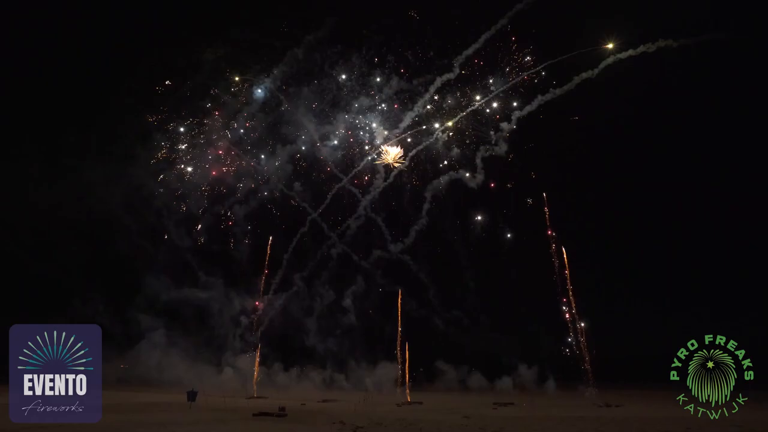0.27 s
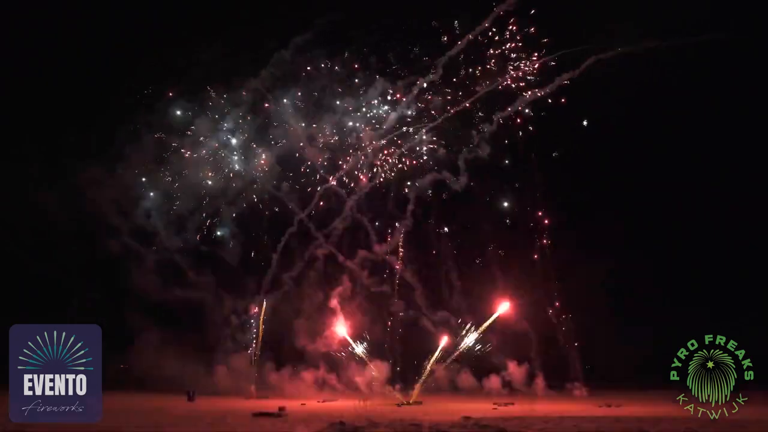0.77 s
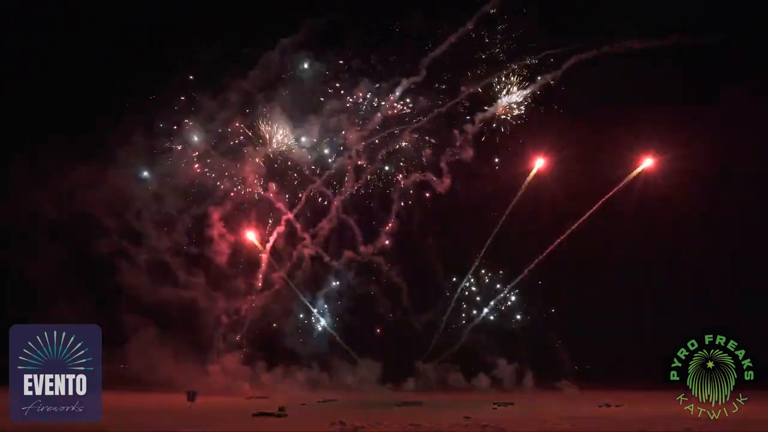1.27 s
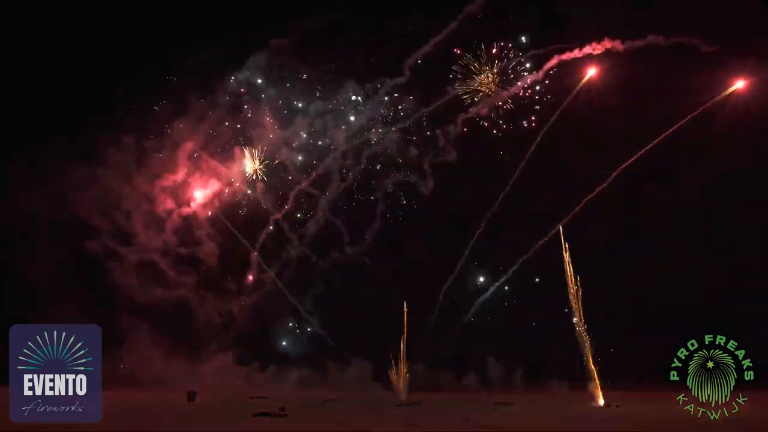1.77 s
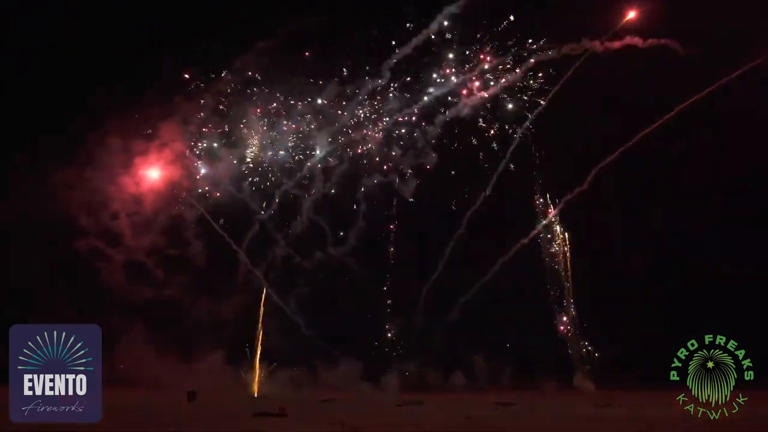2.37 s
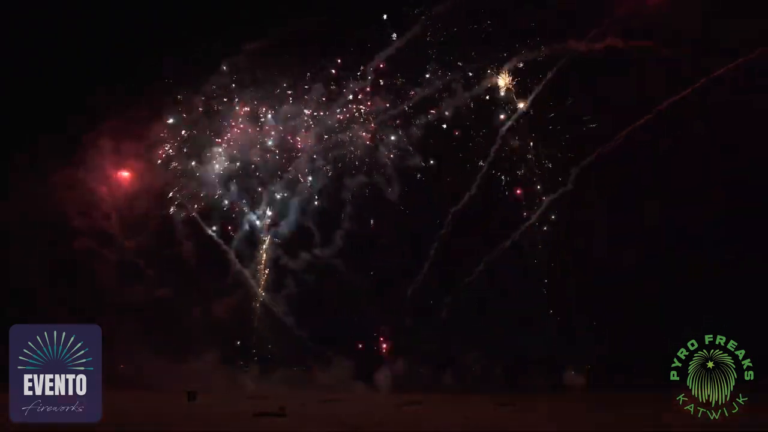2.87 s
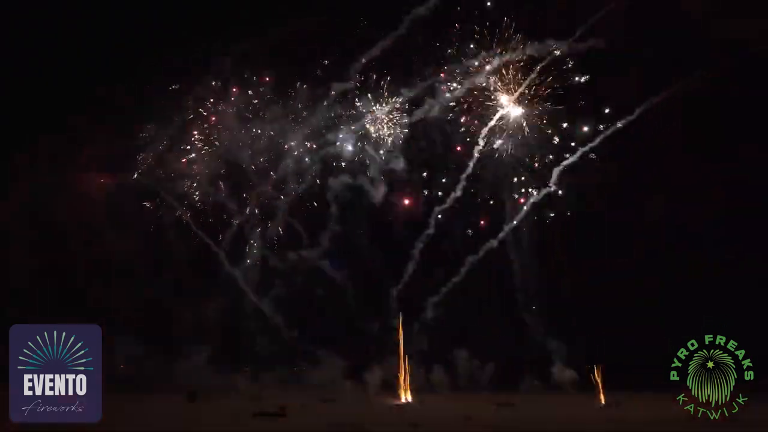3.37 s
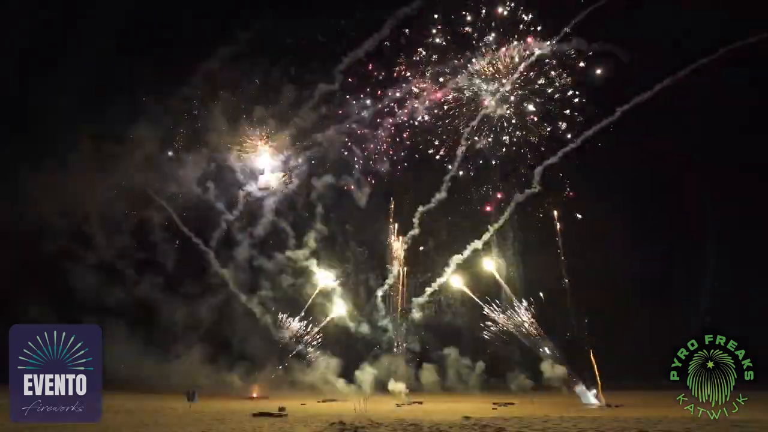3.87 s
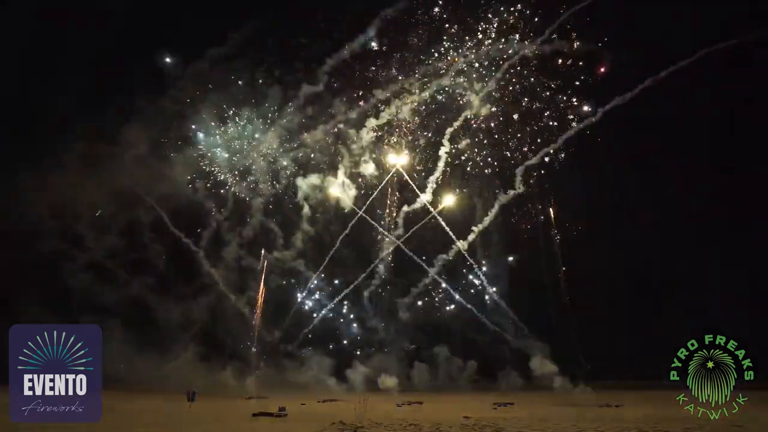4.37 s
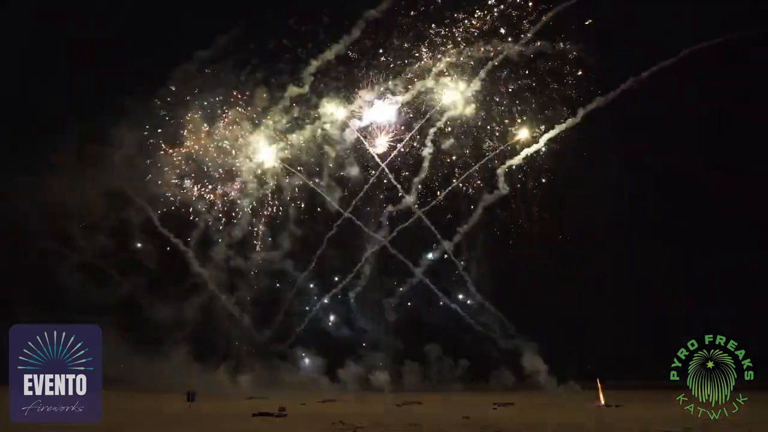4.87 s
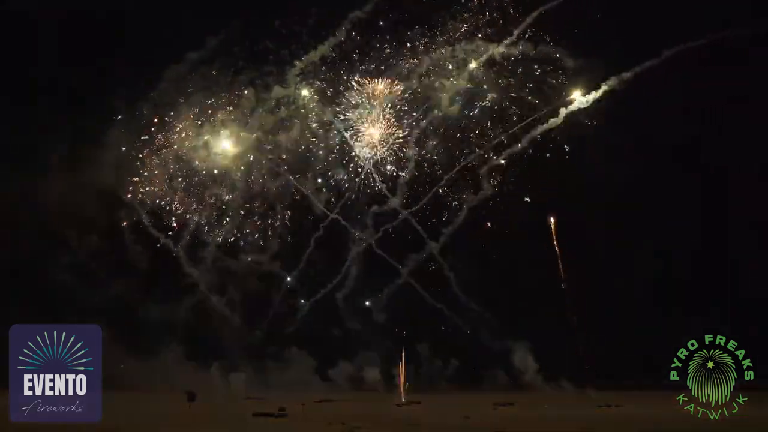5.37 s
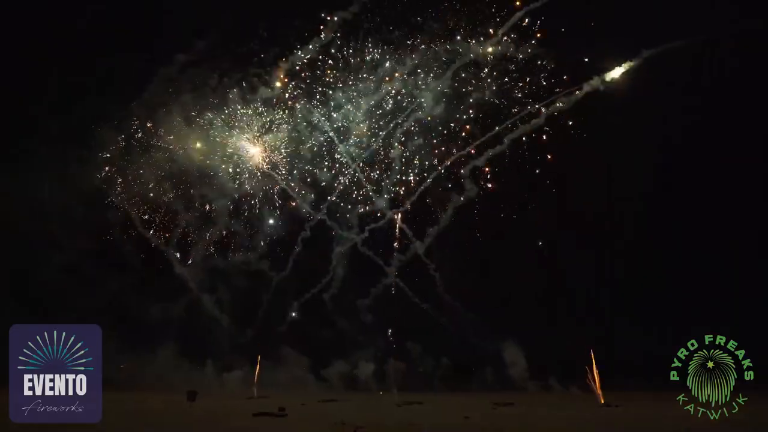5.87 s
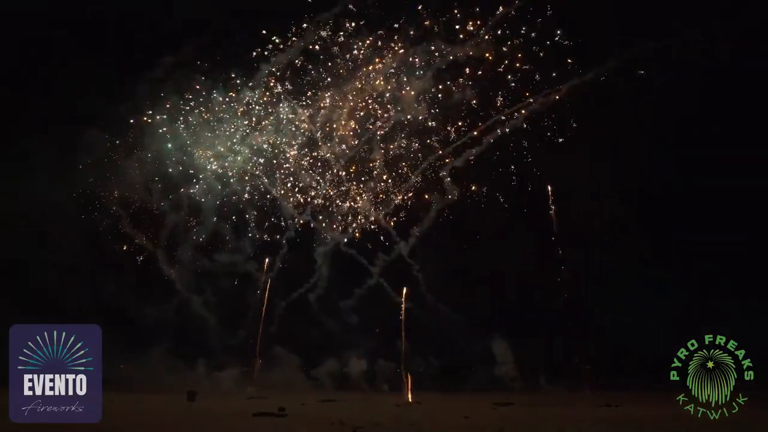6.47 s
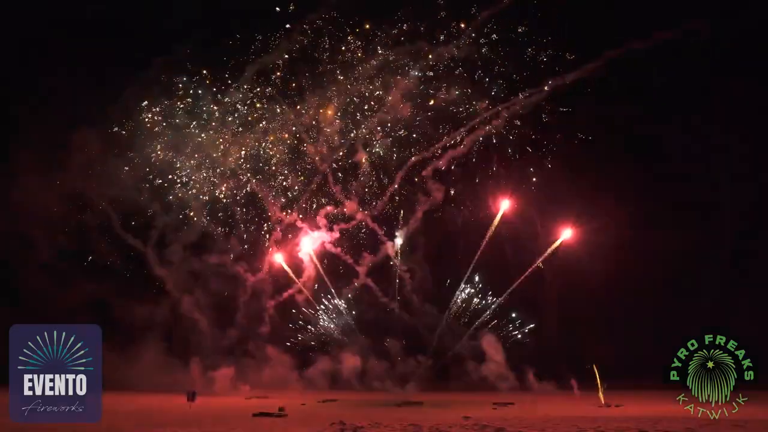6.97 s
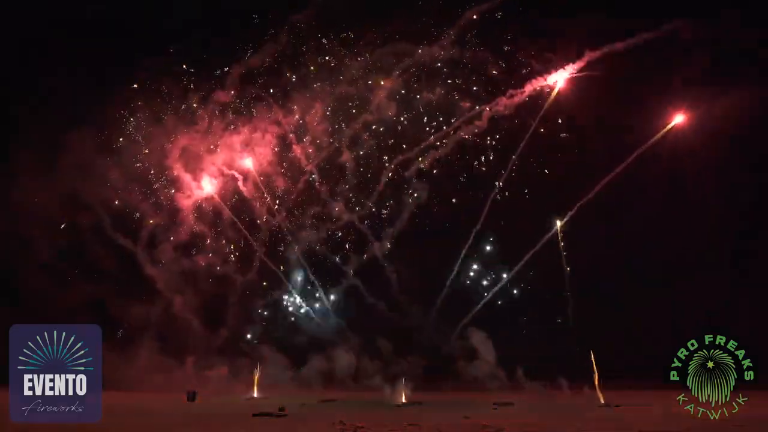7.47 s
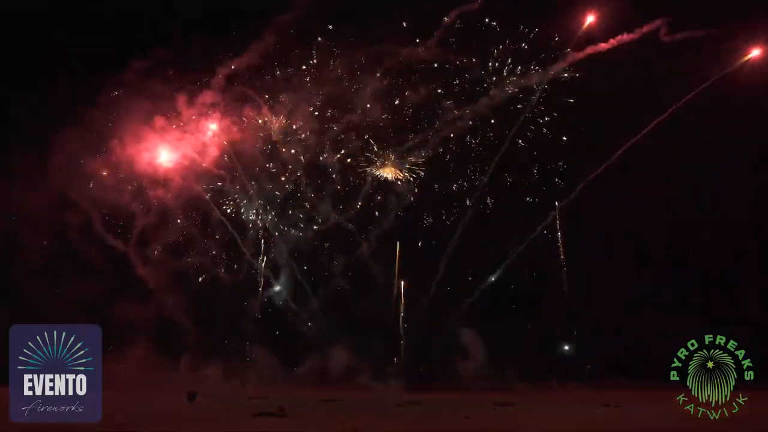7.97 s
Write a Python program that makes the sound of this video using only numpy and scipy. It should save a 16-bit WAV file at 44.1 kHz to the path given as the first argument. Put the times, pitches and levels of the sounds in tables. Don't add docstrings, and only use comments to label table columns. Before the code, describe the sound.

Dense volleys of hard, clipped firework bursts and drier launch cracks, with brief lulls of long dull rumble, on a wide open field at night.

```python
import sys
import numpy as np
from scipy import signal
from scipy.fft import rfft, irfft
from scipy.io import wavfile
from scipy.ndimage import uniform_filter1d

SR = 44100
rng = np.random.default_rng(int(sys.argv[2]) if len(sys.argv) > 2 else 0)


def ratio_of_db(decibels):
    return 10 ** (np.asarray(decibels, float) / 20)


def bounce(signal):
    frames = np.transpose(np.atleast_2d(signal))
    limited = np.clip(frames, -1, 1)
    pcm = np.round(limited * 32767).astype(np.int16)
    wavfile.write(sys.argv[1], SR, pcm)


N = 363384
LEAD = 2048
PADDED = N + 2 * LEAD


def colour(x, points):
    hz, db = np.transpose(points)
    f = np.maximum(np.arange(x.shape[-1] // 2 + 1) * SR / x.shape[-1], 1)
    gain = ratio_of_db(np.interp(np.log(f), np.log(hz), db))
    y = irfft(rfft(x) * gain, x.shape[-1])
    return y / np.sqrt(np.mean(y ** 2))


def diffuse(size, mid_points, side_points, side_db):
    mid, side = rng.standard_normal((2, size))
    difference = ratio_of_db(side_db) * colour(side, side_points)
    return colour(mid, mid_points) + difference * np.array([[1], [-1]])


def blast(n, hz, cycles, rise):
    u = np.maximum(n, 0)
    front = 1 - np.exp(-u / rise)
    fade = np.exp(-(u * hz / SR / cycles) ** 2.03)
    return front * np.cos(2 * np.pi * hz * u / SR) * fade


def add(out, s, wave, direction, edge, port_lag):
    at = s * SR + LEAD
    n = np.arange(-4, 900) - at % 1
    body = wave(n - port_lag / 2)
    step = edge * (wave(n) - wave(n - port_lag))
    i = int(at) - 4
    left = body * (1 - direction) / 2 - step
    right = body * (1 + direction) / 2 + step
    out[:, i:i + len(n)] += [left, right]


# frequency [Hz], strength [dB per Hz].
NIGHT_MID = [(20, -20.5), (50, 7), (150, -1.5), (500, -8.5), (1200, -9), (3000, -23.5), (8000, -27),
             (12500, -35.5), (14500, -63.5)]
NIGHT_SIDE = [(20, -19), (50, -8.5), (150, -7.5), (500, -11), (1200, -10), (3000, -21.5), (8000, -32.5),
              (12500, -41), (14000, -72)]
# start and end in seconds [s], first and last pitch [Hz], level [dB].
WHISTLES = [
    (1.062, 1.32, 1135, 1056, -69),
    (6.196, 6.637, 843, 829, -64.5),
    (7.247, 7.754, 1062, 1045, -72),
]


def night():
    t = np.arange(N) / SR
    out = ratio_of_db(-66) * diffuse(N, NIGHT_MID, NIGHT_SIDE, 4)
    for start, end, hz0, hz1, db in WHISTLES:
        swell = np.sin(np.pi * np.clip((t - start) / (end - start), 0, 1)) ** .5
        flutter = ratio_of_db(1.5 + colour(rng.standard_normal(N), [(15, 3), (40, -43.5)]))
        pitch = np.interp(t, [start, end], [hz0, hz1])
        tone = np.sin(2 * np.pi * np.cumsum(pitch) / SR)
        out = out + ratio_of_db(db) * swell * np.array([[.5], [1.3]]) * flutter * tone
    return out


# start in seconds [s], crack level [dB], thump level [dB].
RIGHT_LIFTS = [(.012, -23, -21), (.1748, -20, -14.5), (.8597, -13.5, -15.5), (1.6057, -20, -16),
               (1.6308, -24.5, -12), (1.6698, -25.5, -14), (1.6993, -20.5, -13.5), (1.741, -18.5, -14),
               (1.7812, -18, -13.5), (2.0951, -19, -11), (2.1432, -18.5, -11.5), (2.1875, -20.5, -12.5),
               (2.241, -41, -20), (3.519, -18.5, -11), (3.6075, -16.5, -31.5), (3.8129, -21, -16.5),
               (3.8686, -9.5, -7.5), (3.8716, -12, -19.5), (4.0681, -22, -15), (5.134, -19.5, -14.5),
               (6.0798, -20, -12.5), (6.8593, -8.5, -7), (7.2037, -22, -15.5), (7.6868, -23.5, -14)]
LEFT_LIFTS = [(.418, -26, -18.5), (.786, -24, -21), (.8161, -25.5, -19.5), (2.3778, -27, -15),
              (2.446, -24.5, -19), (2.5461, -31, -25), (2.591, -25.5, -19.5), (2.6334, -24.5, -19.5),
              (3.758, -26, -22), (3.9125, -21, -10), (3.919, -28.5, -25.5), (4.2282, -25.5, -20),
              (4.31, -27.5, -19.5), (4.34, -27, -22), (4.348, -14, -12.5), (4.3785, -23.5, -17),
              (5.1755, -26, -20), (5.7598, -31, -27.5), (6.0616, -41.5, -22.5), (6.4821, -25, -17),
              (7.7383, -20, -18.5), (7.7975, -25, -20), (7.891, -37, -29)]
SHORT_TUBE_LIFTS = [(.2791, -22, -17), (.4379, -21.5, -19.5), (.9566, -8.5, -10.5), (.9679, -24.5, -29.5),
                    (1.9469, -15.5, -14.5), (2.864, -30, -36), (3.205, -28, -22), (3.592, -18.5, -15.5),
                    (3.6263, -26.5, -17), (3.6472, -22, -20), (3.7527, -24, -29), (6.4408, -19, -19.5),
                    (6.72, -24.5, -20.5), (6.854, -11.5, -5.5), (7.7351, -22, -21), (7.905, -15.5, -13.5)]
LONG_TUBE_LIFTS = [(.858, -8, -16), (.8696, -20, -41), (.9543, -18, -20), (1.8263, -24.5, -21),
                   (1.9837, -20, -26), (2.215, -17.5, -24), (3.6669, -20.5, -18.5), (3.921, -19, -17.5)]


def tubes():
    # lifts, direction (-1 left to 1 right), tube pitch Hz
    racks = [(RIGHT_LIFTS, 1.6, 257), (LEFT_LIFTS, -0.75, 183),
             (SHORT_TUBE_LIFTS, 0.62, 194), (LONG_TUBE_LIFTS, .1, 183)]
    return [(*row, direction, hz) for rows, direction, hz in racks for row in rows]


# start in seconds [s], blast level [dB],
# direction [-1 left to 1 right], delay of the ground echo [ms].
LEFT_BURSTS = [(.0815, 1.7, -0.59, 5.9), (.6536, 1, -.6, 6.38), (1.4738, 1.1, -0.5, 6.25),
               (1.718, 3, -0.24, 6.9), (2.0456, 0.5, -.75, 5.87), (2.3428, 0, -.59, 6.22),
               (2.5016, 0.5, -.59, 6.15), (4.0061, -1, -0.64, 7.2), (4.1122, 1.5, -.59, 6.21),
               (4.156, -1.5, -.67, 6.33), (4.16, 1.1, -.5, 5.56), (4.1887, 1.4, -.56, 6.07),
               (4.2438, 1.6, -.68, 5.98), (4.3938, 0.8, -.65, 5.95), (5.7775, 1.6, -0.58, 6.25),
               (5.8002, 1, -.65, 8.2), (5.901, 1.5, -0.68, 6.0), (5.9183, 1, -0.85, 6.05),
               (5.9724, 0, -.62, 6.53), (6.0312, 2.5, -.62, 6.15), (6.1516, 1.2, -.63, 6.28),
               (7.9168, 1.5, -.63, 5.56), (8.1958, 0.3, -.46, 6.53)]
MIDDLE_BURSTS = [(.2206, 3.5, .14, 7.05), (.5208, 1.6, 0.22, 6.41), (2.2181, 3.5, 0.18, 7.04),
                 (3.4437, 3, 0.12, 7.11), (3.481, -0.4, 0.33, 7.31), (5.0634, 4, 0.093, 7.34),
                 (5.1554, 3, 0.21, 6.84), (5.1893, 1.5, .35, 7.3), (5.2112, 4, -0.022, 7.34),
                 (5.382, 2.5, 0.18, 7.14), (5.396, 2.8, -.27, 6.73), (5.4213, 1.7, .57, 7.03),
                 (5.448, 4, -0.015, 6.7), (5.5011, 2.5, .22, 7.12), (5.5603, 0.5, 0.57, 7.53),
                 (5.5652, 3.5, -0.11, 7.03), (5.6104, 2.5, 0.19, 6.78), (6.9339, 3, .19, 6.94),
                 (8.1781, 4, 0.13, 6.37)]
RIGHT_BURSTS = [(.1294, 0.8, 1.6, 7.7), (1.3935, 1.3, 1.4, 7.3), (1.9643, 2.6, 0.88, 8.1),
                (2.841, 4, 1.01, 6.36), (3.1444, 2.2, 1.2, 7.5), (3.176, 3, 1.4, 7.4),
                (3.3971, 3.1, 0.65, 7.2), (3.4017, 1.5, 1.7, 7.62), (3.4489, 2.2, 1.4, 7.9),
                (3.5435, 3.7, 0.87, 7.2), (3.6847, 3, 0.75, 7.31), (3.7013, 4, 1.7, 7.2),
                (3.7816, 1.5, 1.08, 7.55), (3.9596, 2, 1, 7.4), (3.994, 2.8, 1, 7.9), (5.2262, 2, 1.1, 8),
                (5.7331, 2.5, 1.2, 7.45), (6.8396, 4, 0.88, 7.5), (7.8608, 2, 1.01, 7.6)]


def shells():
    # bursts, shock edge dB, ground echo dB
    batteries = [(LEFT_BURSTS, -8, -7.5), (MIDDLE_BURSTS, -6.5, -8), (RIGHT_BURSTS, -3, -7)]
    return [(s, db, direction, edge_db, echo_ms, echo_db)
            for rows, edge_db, echo_db in batteries
            for s, db, direction, echo_ms in rows]


# start in seconds [s], blast level [dB], direction [-1 to 1].
EARLIER_BURST = (0.00021, 0.9, 0.18)
# frequency [Hz], strength [dB].
SCATTER_MID = [(60, -9), (150, 7.5), (350, 6.5), (700, 3), (1500, -3), (3000, -9), (6000, -11.5),
               (12000, -77)]
SCATTER_SIDE = [(60, -19.5), (150, 0.5), (350, 1), (700, -2), (1500, -7), (3000, -15), (6000, -19),
                (12000, -23.5), (15000, -41.5)]
# frequency [Hz], strength [dB per Hz].
RUMBLE_MID = [(30, -28), (80, -8.5), (160, 1), (400, -4.5), (900, -8.5), (2000, -16.5), (5000, -28.5),
              (12000, -46)]
RUMBLE_SIDE = [(30, -28.5), (80, -4.5), (160, -4.5), (400, -8), (900, -11), (2000, -20), (6000, -28.5),
               (12000, -40.5), (15000, -62)]


def field():
    kicks = np.zeros((2, PADDED))
    shots = [EARLIER_BURST] + [row[:3] for row in shells()]
    shots += [(s, thump_db - 3, direction) for s, _, thump_db, direction, _ in tubes()]
    for s, db, direction in shots:
        lean_db = 0.47 * direction * np.array([-1, 1])
        kicks[:, int(s * SR) + LEAD] += ratio_of_db(db + lean_db) * rng.choice([-1, 1])
    t = np.arange(2 * SR) / SR
    after_echo = np.clip((t - .006) / .004, .15, 1)
    near = after_echo * (ratio_of_db(-21.5 - 60 * t / 0.033) + ratio_of_db(-40 - 60 * t / 0.27))
    far = np.clip(t / 0.15, 0, 1) * ratio_of_db(-58 - 60 * t / 1.92)
    near_reply = near * diffuse(len(t), SCATTER_MID, SCATTER_SIDE, 7.5)
    far_reply = far * diffuse(len(t), RUMBLE_MID, RUMBLE_SIDE, 8)
    scatter = signal.fftconvolve(kicks, near_reply, axes=1)[:, :PADDED]
    rumble = signal.fftconvolve(kicks, far_reply, axes=1)[:, :PADDED]
    lump_tone = [(20, -10.5), (60, 11.5), (150, 1.5), (400, -22), (2000, -81)]
    lumps = ratio_of_db(1.54 * colour(rng.standard_normal(PADDED), lump_tone))
    return scatter * lumps + rumble


# start in seconds [s], boom level [dB], direction [-1 to 1],
# fizz level [dB], fizz fade [ms].
SALVOS = [
    (0.858, -19, 0.14, -34.5, 6.8),
    (0.954, -27, -0.23, -35, 5.3),
    (3.869, -19, 1.1, -30.5, 4.5),
    (3.9184, -20.5, -.5, -33.5, 5),
    (6.855, -17.5, 0.0071, -37.5, 31),
]


def lifts():
    out, spit = np.zeros((2, PADDED)), np.zeros(PADDED)
    n = np.arange(-400, 4000)
    age = np.abs(n)
    powder_mid = [(500, -11), (1500, 1.5), (4500, -2.5), (7500, -3.5), (10000, -20.5)]
    powder_side = [(500, -20.5), (2000, -7), (6000, -2.5), (11000, -5), (16000, -18)]
    powder = diffuse(PADDED, powder_mid, powder_side, 2)
    for s, crack_db, thump_db, direction, tube_hz in tubes():
        thump_gain = ratio_of_db(thump_db) / (1 + abs(direction))
        add(out, s, lambda k: thump_gain * blast(k, tube_hz, .9, 6), direction, 0, 2)
        add(out, s - .00006, lambda k: ratio_of_db(crack_db + 2) * blast(k, 2300, .32, .55),
            .6 * direction, -1.1, 2)
        before = ratio_of_db(-15) * np.exp(n / 18)
        after = np.exp(-age / 60) + ratio_of_db(-25.5) * np.exp(-age / 620)
        spit[int(s * SR) + LEAD + n] += ratio_of_db(crack_db - 18) * np.where(n < 0, before, after)
    for s, boom_db, direction, fizz_db, fade_ms in SALVOS:
        add(out, s, lambda k: ratio_of_db(boom_db) * blast(k, 92, 0.84, 30), direction, 0, 2)
        before = np.exp(n / 60)
        after = np.exp(-age / SR * 2000 / fade_ms) + ratio_of_db(-21) * np.exp(-age / SR / 0.03)
        spit[int(s * SR) + LEAD + n] += ratio_of_db(fizz_db) * np.where(n < 0, before, after)
    grains = ratio_of_db(4 * colour(rng.standard_normal(PADDED), [(1500, 0), (4000, -30)]))
    return out + spit * grains * powder


def bursts():
    out = np.zeros((2, PADDED))
    front_rise, echo_rise = .7, 1.8

    def shock(n):
        return blast(n, 384, 0.51, front_rise) + ratio_of_db(-11.5) * blast(n, 1480, 0.26, front_rise)

    for s, db, direction, edge_db, echo_ms, echo_db in shells():
        add(out, s, lambda n: ratio_of_db(db - 1.5) * shock(n), direction, ratio_of_db(edge_db - db + 5.5), 2)
        echo_s = s + echo_ms / 1000
        add(out, echo_s, lambda n: ratio_of_db(db + echo_db) * blast(n, 425, .55, echo_rise),
            1.4 * direction - .3, -.3, 6)
        for late, side in rng.random((3, 2)):
            add(out, echo_s + .0005 * late, lambda n: ratio_of_db(db - 16) * blast(n, 3110, 0.2, front_rise),
                direction, 2 * side - 1.4, 2)
    size = uniform_filter1d(np.abs(out).sum(0), size=40, origin=19)
    ripple_mid = [(600, -28.5), (2000, 10.5), (4500, -22.5), (7000, -6.5)]
    ripple_side = [(600, -12.5), (2500, -13), (7000, 10.5), (12000, 4), (16000, -12)]
    return out + ratio_of_db(-25) * size * diffuse(PADDED, ripple_mid, ripple_side, 0.95)


def scene():
    return (bursts() + lifts() + field())[:, LEAD:LEAD + N] + night()


# lower edge of the treble [Hz], margin under the tails [dB].
STARVED = [(12500, -31), (9000, -34), (7000, -36), (5800, -38), (4700, -39), (3700, -46), (2900, -51)]


def thin_centre(mid, tails):
    threshold = np.minimum(tails * (tails / ratio_of_db(-45)) ** .9, ratio_of_db(-9))
    for edge_hz, margin_db in STARVED:
        margin_db = margin_db + 3 * np.repeat(rng.standard_normal(N // 1024 + 1), 1024)[:N]
        treble = signal.butter(8, edge_hz, "highpass", fs=SR, output="sos")
        band = signal.sosfiltfilt(treble, mid)
        own = np.sqrt(uniform_filter1d(band ** 2, size=90) + 1e-14)
        lost = 1. * (own < ratio_of_db(margin_db) * threshold)
        mid = mid - band * uniform_filter1d(lost, size=40)
    return mid


# frequency [Hz], level [dB].
WHINE = [
    (15734.3, -61.5),
    (15747.3, -66.5),
]


def whine(tails):
    t = np.arange(N) / SR - 4.742
    tones = sum(np.sqrt(2) * ratio_of_db(db) * np.sin(2 * np.pi * hz * t) for hz, db in WHINE)
    return tones * uniform_filter1d(1. * (tails < ratio_of_db(-17)), size=200)


def low_pass(x):
    return signal.sosfilt(signal.butter(12, 16830, fs=SR, output="sos"), x)


def record(dry):
    bass_cut = signal.butter(3, 83, "highpass", fs=SR, output="sos")
    x = np.clip(signal.sosfilt(bass_cut, dry), -1, 1)
    self_noise_tone = [(15, -7.5), (28, 2), (45, -3), (90, -29.5), (300, -71.5)]
    x = x + ratio_of_db(-78) * colour(rng.standard_normal(x.shape), self_noise_tone)
    mid, side = (x[0] + x[1]) / 2, (x[0] - x[1]) / 2
    tails = np.sqrt(uniform_filter1d(4 * side ** 2, size=1500) + 1e-14)
    mid = thin_centre(mid, tails) + whine(tails)
    top_cut = signal.ellip(6, .1, 50, 16500, fs=SR, output="sos")
    x = signal.sosfiltfilt(top_cut, [mid + side, mid - side])
    return low_pass(np.clip(x, -1, 1))


dry = scene()
out = record(dry)
bounce(out)
```